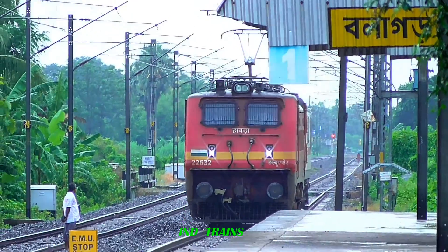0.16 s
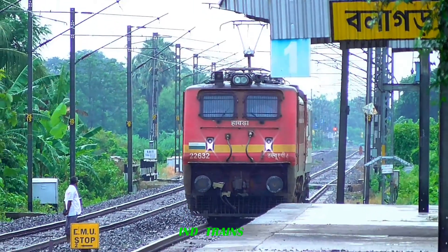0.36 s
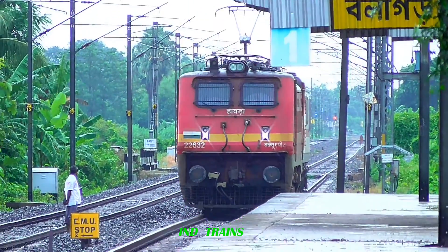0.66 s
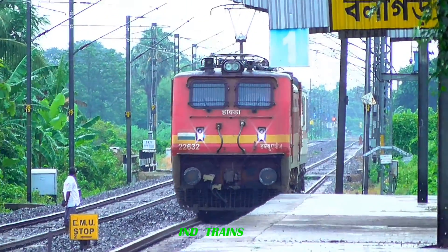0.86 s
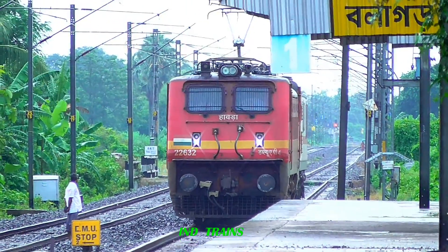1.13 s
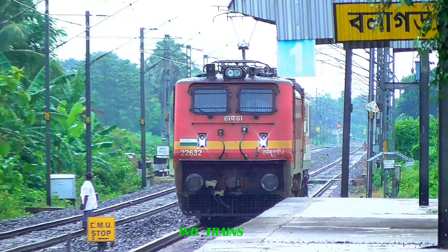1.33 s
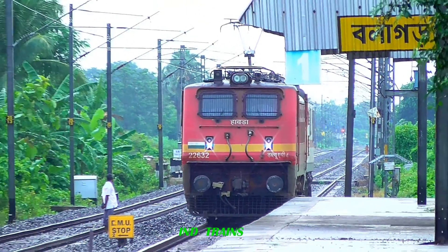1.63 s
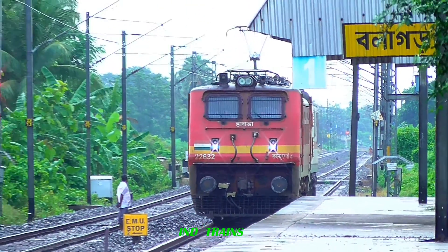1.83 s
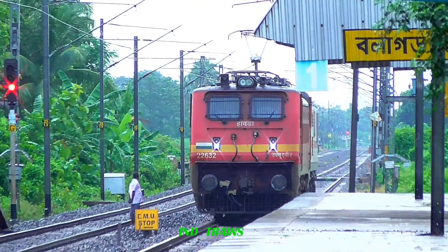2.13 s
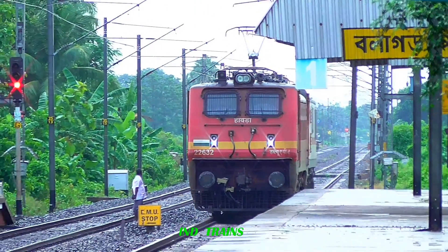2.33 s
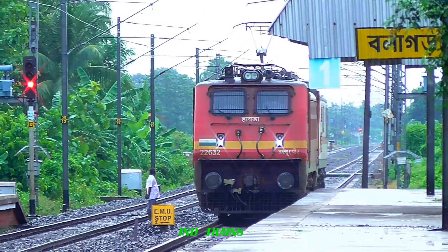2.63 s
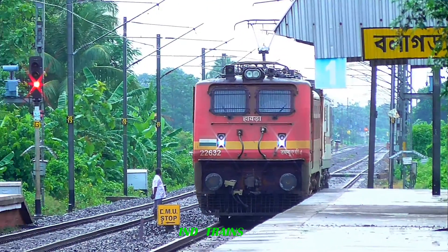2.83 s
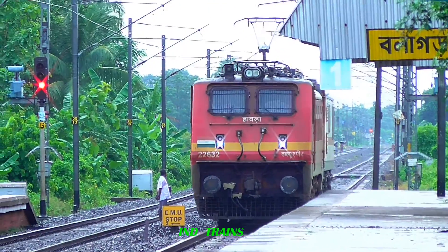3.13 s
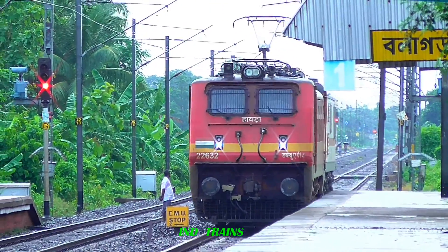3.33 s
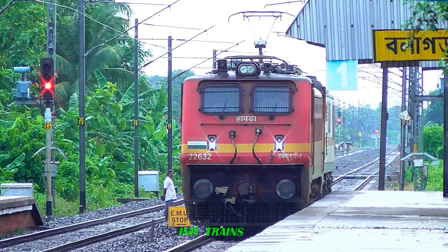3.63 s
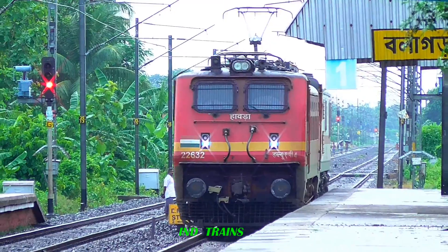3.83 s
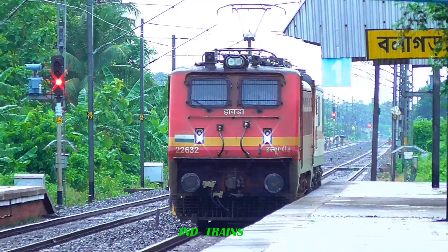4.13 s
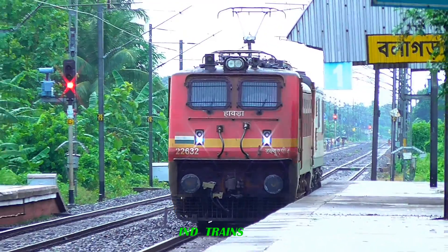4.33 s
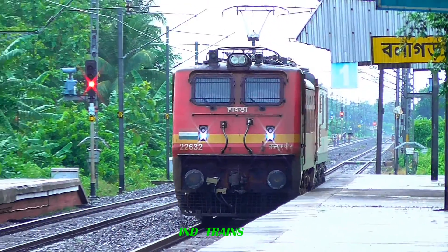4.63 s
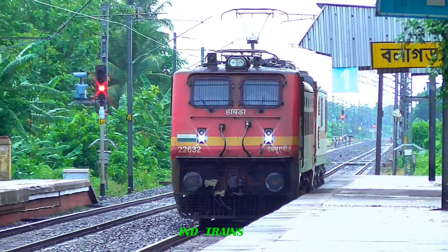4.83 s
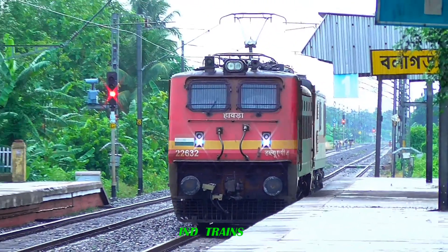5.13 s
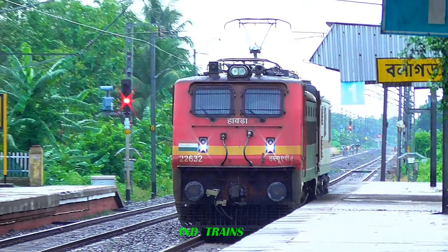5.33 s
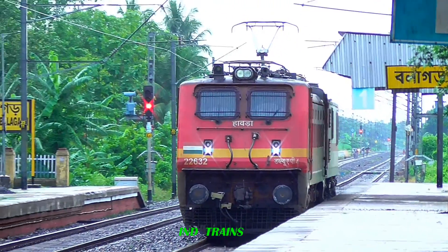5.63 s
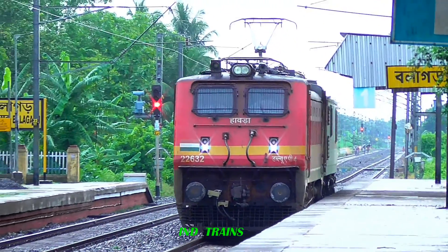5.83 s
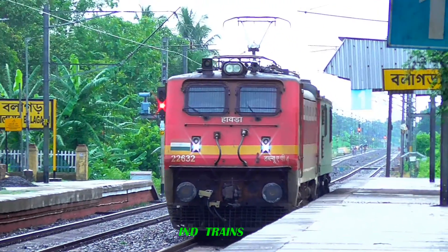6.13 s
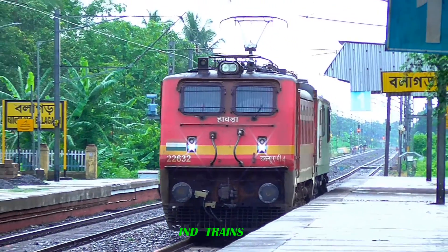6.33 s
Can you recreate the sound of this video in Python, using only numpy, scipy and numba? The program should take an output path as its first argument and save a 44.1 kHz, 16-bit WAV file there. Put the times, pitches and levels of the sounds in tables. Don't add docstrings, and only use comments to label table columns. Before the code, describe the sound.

Light rain patters sharply on a metal shelter, with faint birds and insects, over the broad rumble of an approaching electric locomotive. Early on, its horn sounds from afar at a steady high pitch, sagging and echoing away. The roar grows, joined by two slightly beating gear whines. Near the end the horn returns hard and piercing, still sounding at the cut. Nearly mono camera microphone with automatic level control.

```python
import sys
import numpy as np
from scipy import signal
from scipy.io import wavfile
from scipy.ndimage import uniform_filter1d
from numba import njit

SR = 44100
rng = np.random.default_rng(int(sys.argv[2]) if len(sys.argv) > 2 else 0)


def to_linear_factor(level_db):
    exponent = np.asarray(level_db, float) / 20
    return 10 ** exponent


def put_to_file(sound):
    columns = np.atleast_2d(sound).T
    safe = np.clip(columns, -1, 1)
    whole_steps = np.round(safe * 32767)
    wavfile.write(sys.argv[1], SR, whole_steps.astype(np.int16))


N = 285768
T = np.arange(N) / SR


@njit
def svf(x, hz, width):
    y, b, l = np.empty(len(x)), 0., 0.
    g, k = np.tan(np.pi * hz / SR), width / hz
    for i in range(len(x)):
        v = (b + g * (x[i] - l)) / (1 + g * (g + k))
        b, l, y[i] = 2 * v - b, l + 2 * g * v, k * v
    return y


def walk(rate):
    hold = int(SR / 32 / rate)
    steps = np.repeat(rng.standard_normal(N // 32 // hold + 2), hold)
    coarse = uniform_filter1d(uniform_filter1d(steps, hold), hold)
    return 1.3 * np.interp(T, np.arange(len(coarse)) * 32 / SR, coarse)


def track(*tables):
    s, *columns = np.transpose(np.concatenate(tables))
    gate = sum((T >= rows[0][0]) & (T <= rows[-1][0] + .04) for rows in tables)
    return [np.interp(T, s, c) for c in columns], uniform_filter1d(1. * gate, size=200)


def on_log(table, hz):
    f, value = np.transpose(table)
    return np.interp(np.log(hz), np.log(f), value)


def partial(phase, db, flutter_db, flutter_rate, side_db=-24):
    wave = np.sin(phase + 0.033 * flutter_db * walk(flutter_rate))
    side = to_linear_factor(side_db + 1.1 * walk(6)) * np.sin(phase + 2.23 * walk(8.2))
    gain = np.sqrt(2) * to_linear_factor(db + flutter_db * walk(flutter_rate))
    return gain * np.array([wave + side, wave - side])


def tick(hz, width, decay_s, length=600):
    age = np.arange(length) / (decay_s * SR)
    y = rng.standard_normal(length) * age * np.exp(-age)
    for _ in range(3):
        y = svf(y, 1. * hz, 1. * width)
    return y / np.max(np.abs(y))


def add(out, s, sound, pan_db):
    i = int(s * SR)
    n = min(len(sound), N - i)
    out[:, i:i + n] += sound[:n] * to_linear_factor(np.array([[pan_db], [-pan_db]]) / 2)


def horn():
    # (time [s], level [dB])
    pressure = [
        [(.474, -43), (.493, -3.5), (.56, 1), (.72, 0.5), (.95, 2), (1.4, 0.5), (1.6, 1), (1.8, 1.5)],
        [(5.88, -38), (5.89, -20), (5.904, -1), (5.95, -0.5), (6.17, 0), (6.29, 0.5), (6.39, 1.5), (6.48, 2.5)],
    ]
    # (time [s], frequency [Hz])
    reed = [(0.5, 780.0), (0.65, 778.0), (0.85, 776.1), (0.95, 775.8), (1.6, 775.9), (1.75, 773),
            (2.3, 772), (5.88, 780.8), (5.98, 780.4), (6.2, 779.2), (6.48, 777.8)]
    # (multiple [1], far level [dB], far slope [dB/s], near level [dB], near slope [dB/s])
    strong = [(1, -25, -2.5, -8.5, 2.5), (2, -21, -5.5, -11.5, -13.5), (3, -30.5, -9, -25, -4),
              (4, -40.5, -19, -38, -14.5), (11, -57.5, -3.5, -48.5, -12.5)]
    # (multiple [1], far level over the 11th [dB], near level over the 11th [dB])
    buzz = [(5, 0.5, 9), (6, -6, -5.5), (7, -20, -11), (8, -9.5, -3), (9, -10, -9), (10, -6, -0.5),
            (11, 1.5, 3.5), (12, -3, 5), (13, -5, 2.5), (14, -8, 1.5), (15, -10, -3.5), (16, -17, -6),
            (17, -21, -9.5), (18, -24, -16.5), (19, -20, -14), (20, -26, -32)]
    # (far level [dB], near level [dB])
    jet_db = [3, 8]

    (pressure_db,), gate = track(*pressure)
    phase = 2 * np.pi * np.cumsum(np.interp(T, *np.transpose(reed))) / SR
    far_start, near_start = pressure[0][0][0], pressure[1][0][0]
    near = T > near_start
    age = T - np.where(near, near_start, far_start)

    kick_db = 5 * np.exp(-np.maximum(age - .025, 0) / 0.027)
    levels = []
    for k, far_db, far_slope, near_db, near_slope in strong:
        if k == 1:
            drive_db, stop_s = pressure_db + kick_db, 1.622
        else:
            drive_db, stop_s = np.interp(T - .004, T, pressure_db), 1.68
        release_db = 340 * np.clip(T - stop_s, 0, .5)
        far_level = far_db + far_slope * age - release_db
        levels.append(drive_db + np.where(near, near_db + near_slope * age, far_level))
    first_db, second_db, third_db, fourth_db, high_db = levels

    out = partial(phase, first_db, np.where(near, .5, 1.3), 16, side_db=-21)
    out += partial(2 * phase - .15, second_db, .4, 25, side_db=-28)
    out += partial(3 * phase, third_db, 1.4, 14, side_db=-37.5)
    out += partial(4 * phase, fourth_db, 2.2, 19, side_db=-36)
    for k, far_db, near_db in buzz:
        level_db = high_db + np.where(near, near_db, far_db)
        out += partial(k * phase, level_db, np.where(near, 2.4, 1.4), 22)

    hiss = svf(svf(rng.standard_normal(N), 9800., 6000.), 9800., 6000.)
    out += to_linear_factor(high_db + np.where(near, jet_db[1], jet_db[0])) * hiss
    return out * gate + wall_reflections(phase, first_db, second_db, gate, near)


def wall_reflections(phase, first_db, second_db, gate, near):
    # (delay [s], level [dB], lowering [Hz])
    walls = [(.13132, -3.9, .427), (.15012, -6.5, .762), (.25766, -8, 2.157), (.56065, -14, 3.282),
             (.0996, -17, 7.2)]
    out = 0
    for delay, db, lowered_hz in walls:
        late_gate, late_phase = np.interp(T - delay, T, gate), np.interp(T - delay, T, phase)
        path_phase = late_phase - 2 * np.pi * lowered_hz * (T - 1)
        for k, source_db in ((1, first_db), (2, second_db)):
            level_db = np.interp(T - delay, T, source_db - 14 * near) + db
            level_db = level_db - 17 * (k - 1)
            out = out + late_gate * partial(k * path_phase, level_db, 1.2, 18, side_db=-20)
    return out


def valve():
    # (time [s], peak level [dB])
    openings = [
        (0.489, -40),
        (5.897, -31),
    ]
    out = np.zeros((2, N))
    for s, db in openings:
        spit = tick(9000, 6000, .008, length=3000) + tick(4000, 2500, .008, length=3000)
        add(out, s, to_linear_factor(db) * spit, 0)
    return out


def horn_echo():
    # (time [s], frequency [Hz], first partial level [dB], second partial level [dB])
    returns = [
        [(0.65, 693, -58, -60), (0.85, 693, -48, -54), (1.3, 693, -49, -54), (1.75, 693, -43, -52),
         (1.9, 692, -48, -54), (2.2, 692, -58, -62)],
        [(5.97, 692, -60, -60), (6.05, 692, -40, -41), (6.25, 692.5, -37, -43), (6.46, 693, -35, -42)],
    ]
    # (time [s], frequency [Hz], level [dB])
    last_breath = [(1.58, 737, -38), (1.64, 740, -32.5), (1.72, 735, -47), (1.8, 720, -38),
                   (1.86, 746, -58)]
    (hz, first_db, second_db), gate = track(*returns)
    phase = 2 * np.pi * np.cumsum(hz) / SR
    first = partial(phase, first_db, 3.5, 25, side_db=-20)
    out = gate * (first + partial(2 * phase, second_db, 3.5, 25))
    (hz, db), gate = track(last_breath)
    return out + gate * partial(2 * np.pi * np.cumsum(hz) / SR, db, 3.0, 20.0)


def gears():
    # (time [s], level [dB])
    first_load = [(1.95, -64), (2.25, -39), (2.45, -43.5), (2.85, -39), (2.95, -54), (3.15, -39),
                  (3.33, -48), (3.5, -35), (3.87, -30), (4.08, -39), (4.3, -28.5), (4.5, -35.5),
                  (4.65, -27.5), (4.9, -32.5), (5.1, -29), (5.55, -35), (6.0, -35), (6.48, -39)]
    # (time [s], level [dB])
    second_load = [(2.7, -51), (2.85, -39), (3.05, -54), (3.38, -54), (3.45, -36), (3.95, -40), (4.1, -43),
                   (4.35, -34.5), (4.55, -44), (5.5, -36), (5.7, -32), (5.87, -38), (5.97, -49),
                   (6.46, -42)]
    # (time [s], frequency [Hz])
    second_mesh = [(2.7, 1146), (3.45, 1149), (5.2, 1149), (5.3, 1165), (5.7, 1170), (5.85, 1177),
                   (6.48, 1185)]
    first_hz = 1086.5 + 8.6 * T
    second_hz = np.interp(T, *np.transpose(second_mesh))
    out = 0
    for hz, load in ((first_hz, first_load), (second_hz, second_load)):
        (db,), gate = track(load)
        out = out + gate * partial(2 * np.pi * np.cumsum(hz) / SR, db, 1.37, 16, side_db=-19.5)
    return out


def roar():
    # (time [s], level [dB])
    approach = [(0, -8), (1.0, -4.5), (2.2, -5), (2.9, -3.5), (3.45, -3), (4.1, -2), (4.63, 0.5),
                (5.0, 1.5), (5.4, 4), (5.9, 4), (6.48, 5.5)]
    share = [0.54, 1.0, 0.77, 0.09]
    centre_hz = [300, 950, 3500, 9700]
    # (frequency [Hz], level [dB per Hz])
    colour = [(25, -40), (76, -20.5), (185, -15), (400, -9), (700, -11.5), (1100, -4.5), (1450, -13),
              (1750, -26), (3600, -22.5), (4900, -34), (6600, -61), (8600, -34), (11500, -45), (15500, -51)]
    # (frequency [Hz], side minus mid level [dB])
    side_colour = [(60, -20), (110, -32), (200, -48), (380, -40), (700, -24), (1290, -34), (2380, -34),
                   (4400, -20), (8120, -10.5), (15000, -37)]
    # (frequency [Hz], level over the roar [dB])
    hums = [(425, -18), (917, -32), (1110, 1.5), (1270, -45.5), (1365, -0.5)]

    swing = np.outer(share, np.interp(T, *np.transpose(approach)))
    out, shared = 0, walk(14)
    for hz in 28 * 2 ** np.arange(0, 9.2, 1 / 6):
        place = np.interp(np.log(hz), np.log(centre_hz), np.arange(4))
        low = min(int(place), 2)
        db = swing[low] + (place - low) * (swing[low + 1] - swing[low]) + on_log(colour, hz)
        db = db - .5 * swing[0] * (hz < 160)
        db = db + 1.0 * walk(9) + 1.5 * shared * (hz > 2500)
        mid, side = rng.standard_normal((2, N))
        for _ in range(3):
            mid, side = svf(mid, hz, hz / 4), svf(side, hz, hz / 4)
        side = to_linear_factor(on_log(side_colour, hz)) * side
        out = out + to_linear_factor(db) * np.array([mid + side, mid - side])
    for hz, db in hums:
        out = out + to_linear_factor(db + swing[1] - 1.5) * svf(rng.standard_normal(N), 1. * hz, 26.0)
    return out * to_linear_factor(-13.5)


def rail_joint():
    # (time [s], peak level [dB], frequency [Hz])
    knock = (5.322, -22, 410)
    s, db, hz = knock
    out = np.zeros((2, N))
    add(out, s, to_linear_factor(db) * tick(hz, 420, 0.0042, length=1500), 0)
    return out


def rain():
    # (time [s], peak level [dB], low part level [dB])
    loud_drops = [(0.163, -39, -4), (0.2259, -31.5, 6), (0.3566, -35, -1), (0.8116, -27, -2.5),
                  (0.9757, -34, -22), (1.126, -28, -2), (1.2196, -33.5, -9), (1.3369, -32, -20),
                  (1.3818, -28.5, -3.5), (1.5309, -33, -6), (1.9745, -35.5, -1), (2.1031, -36.5, 5.5),
                  (2.2134, -22.5, -3.5), (2.2498, -33, -2), (2.3775, -30, -9), (2.4627, -38, 1),
                  (2.577, -33, -4), (3.1352, -31.5, 3), (3.1712, -33, 4.5), (3.2945, -35, 4),
                  (3.3413, -33.5, 1), (3.6935, -25.5, -26), (3.8611, -27.5, -24), (3.971, -29, -18),
                  (4.0672, -27, -8), (4.2657, -29.5, -5), (5.5643, -32, -11), (5.5822, -32.5, -15),
                  (5.6351, -32, -17), (5.7595, -36.5, -6)]
    # (time [s], peak level [dB])
    more_drops = [(0.264, -40), (0.4623, -37), (1.0505, -43), (1.2012, -36), (1.292, -35.5), (1.598, -35.5),
                  (1.6696, -38), (2.154, -38), (2.411, -30), (2.4997, -36), (2.6239, -39), (2.641, -36),
                  (2.7359, -37), (3.08, -35), (3.466, -38), (3.5159, -35), (3.8432, -36), (3.933, -41),
                  (4.124, -39), (4.2462, -37), (4.3435, -42), (4.4248, -40), (4.7207, -35), (4.796, -35),
                  (4.8369, -36), (5.0714, -39), (5.4273, -36), (5.4897, -36), (5.8306, -42), (5.843, -33)]
    # (time [s], peak level [dB], frequency [Hz])
    drips = [(0.173, -35.5, 3970), (0.2257, -21.5, 3470), (0.3634, -31, 3820), (1.842, -35, 3810),
             (1.857, -43, 2480), (2.4053, -30, 3330), (3.1363, -29, 4250), (3.7456, -23, 3860),
             (5.3293, -28, 3800)]

    out = np.zeros((2, N))
    stray = rng.random((40, 3)) * [N / SR, 6.5, 14] + [0, -45, -8]
    middling = [(s, db, -1.5) for s, db in more_drops]
    for s, db, low_db in [*loud_drops, *middling, *stray]:
        bright = tick(9400 + 700 * rng.standard_normal(), 6000, 0.00056)
        dull = tick(3800, 3200, 0.00066)
        add(out, s, to_linear_factor(db) * (bright + to_linear_factor(low_db) * dull), -.6)
    for s, db, hz in drips:
        add(out, s, to_linear_factor(db) * tick(hz, 1900, 0.00078), -.4)
    for when, size, pitch in rng.random((1000, 3)):
        patter_db = -53 - 3.5 * np.log(size + 1e-2)
        add(out, when * N / SR, to_linear_factor(patter_db) * tick(7800 + 2600 * pitch, 6000, .0004), -.6)

    smear = rng.standard_normal((2, 2000)) * np.exp(-np.arange(2000) / (0.036 * SR))
    smear[1] = 0.68 * smear[0] + 0.19 * smear[1]
    return out + to_linear_factor(-39) * signal.fftconvolve(out, smear, axes=1)[:, :N]


def birds():
    # (time [s], length [s], start frequency [Hz], end frequency [Hz], level [dB])
    calls = [(0.04, .05, 3450, 3250, -52), (0.328, .025, 3300, 4200, -52), (0.558, .015, 3100, 2600, -44),
             (3.0, .09, 3720, 2720, -48), (2.77, .05, 4150, 4650, -55), (2.87, .05, 4550, 4800, -55),
             (2.92, .04, 4450, 4400, -55), (2.9, .04, 2800, 3500, -52), (3.165, .015, 2700, 3100, -46),
             (3.178, .018, 3950, 3950, -44), (3.19, .025, 3550, 2850, -44), (3.81, .03, 3800, 3500, -49),
             (5.01, .035, 3900, 3400, -45), (5.325, .025, 4000, 3800, -42)]
    out = np.zeros((2, N))
    for s, length, start_hz, end_hz, db in calls:
        n = int(length * SR)
        phase = 2 * np.pi * np.cumsum(np.linspace(start_hz, end_hz, n)) / SR
        note = np.sin(phase) * np.sqrt(np.hanning(n))
        add(out, s, to_linear_factor(db) * np.sqrt(2) * note, -.5)
    return out * to_linear_factor(1.5 * walk(80))


def insects():
    # (time [s], level [dB])
    swell = [(0, -56), (2.3, -87.5), (2.85, -49), (3.4, -55.5), (4.2, -55), (4.6, -76), (5.4, -51),
             (6.48, -42.5)]
    hz, width_hz = 3595., 360.
    band = svf(svf(rng.standard_normal(N), hz, width_hz), hz, width_hz)
    level_db = np.interp(T, *np.transpose(swell)) + 2.9 * walk(45) + 2.0 * walk(8.9)
    return band / np.std(band) * to_linear_factor(level_db)


def ducking(loud):
    threshold_db, slope, settle_s = -11, 0.81, 0.087
    db = 10 * np.log10(uniform_filter1d(np.mean(loud ** 2, axis=0), size=900) + 1e-9)
    keep = np.exp(-1 / (settle_s * SR))
    return to_linear_factor(signal.lfilter([1 - keep], [1, -keep], -slope * np.maximum(db - threshold_db, 0)))


def scene():
    blasts = horn()
    around = ducking(blasts) * (roar() + rain() + insects())
    return blasts + valve() + horn_echo() + gears() + around + rail_joint() + birds()


def roll_off(x):
    return signal.sosfilt(signal.butter(12, 16330, fs=SR, output="sos"), x)


def record(dry):
    fade = np.minimum((T[-1] - T) / 0.00058, 1)
    clipped = np.clip(dry * fade, -1, 1)
    low_pass = signal.ellip(8, .2, 60, 15750, fs=SR, output="sos")
    return roll_off(signal.sosfilt(low_pass, clipped))


dry = scene()
out = record(dry)
put_to_file(out)
```